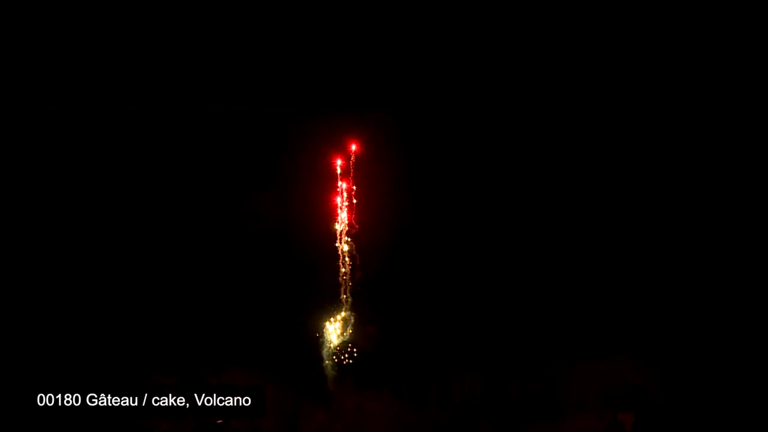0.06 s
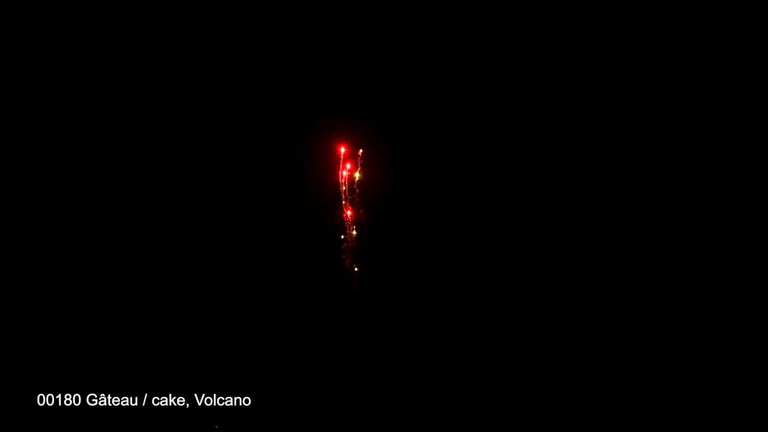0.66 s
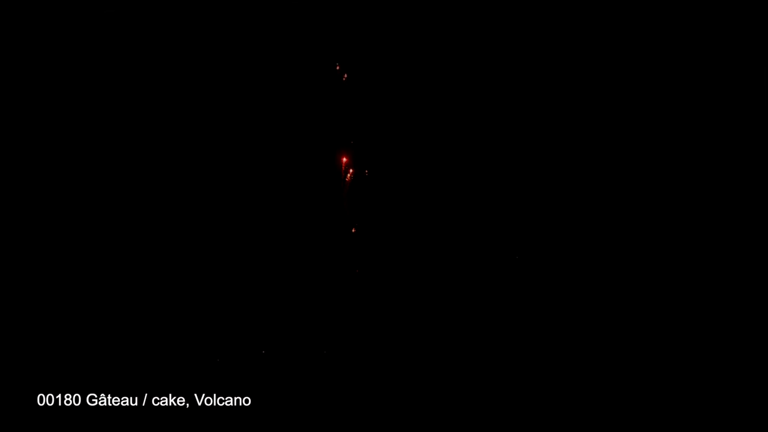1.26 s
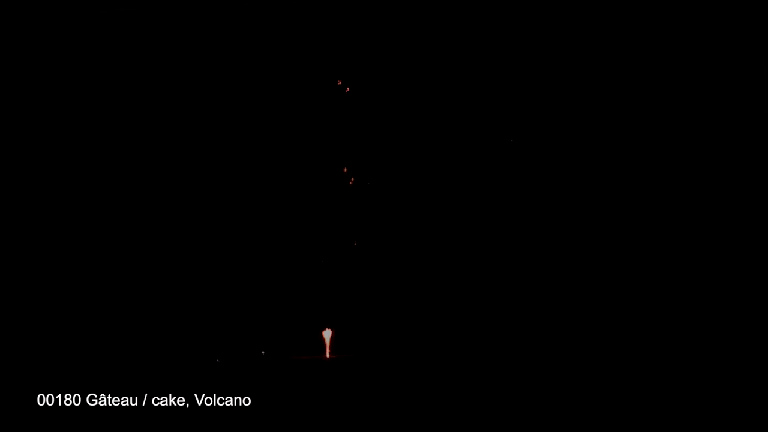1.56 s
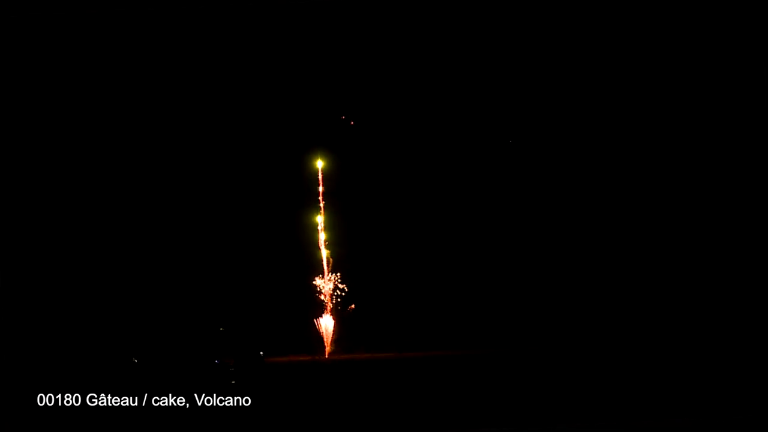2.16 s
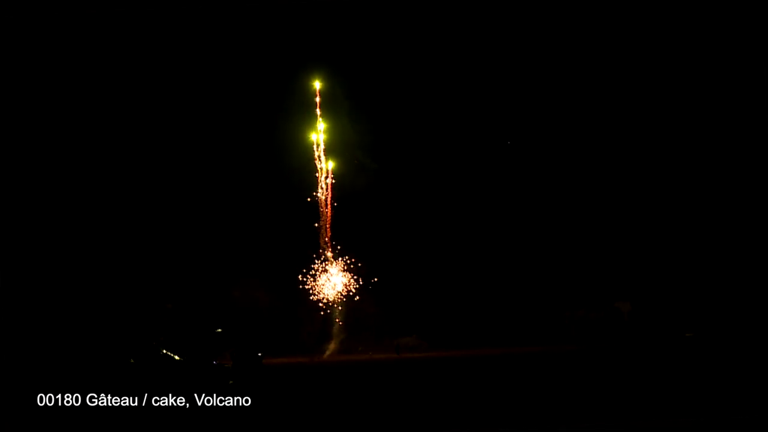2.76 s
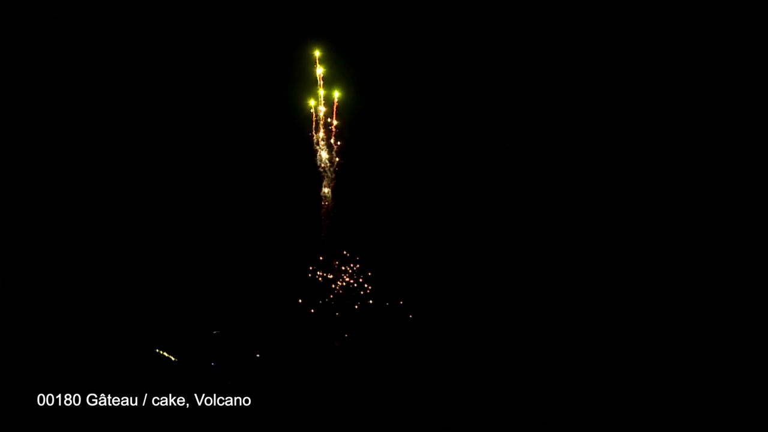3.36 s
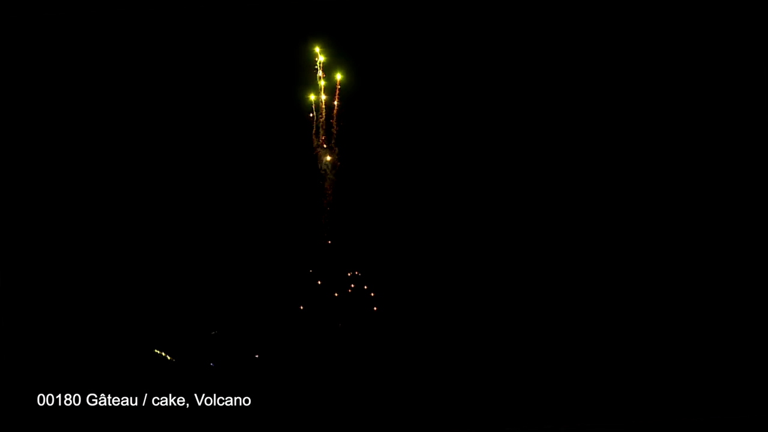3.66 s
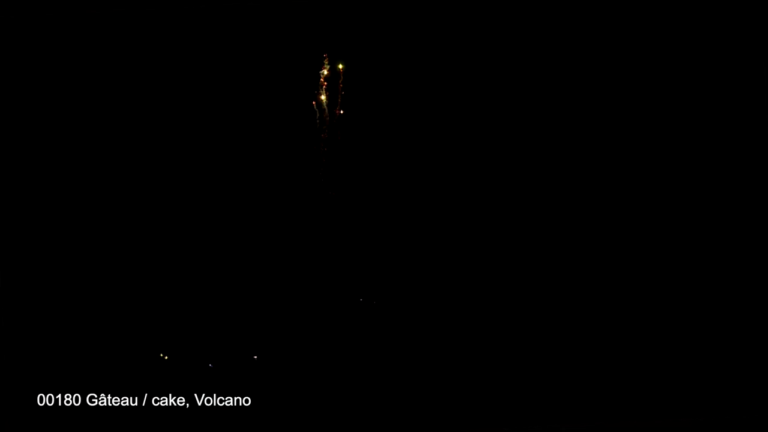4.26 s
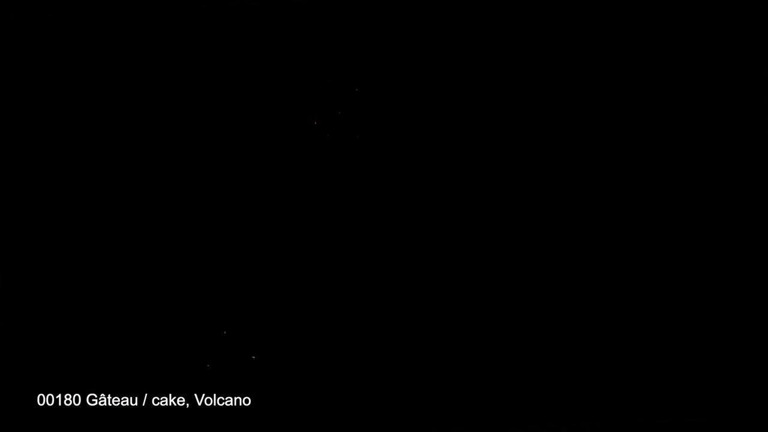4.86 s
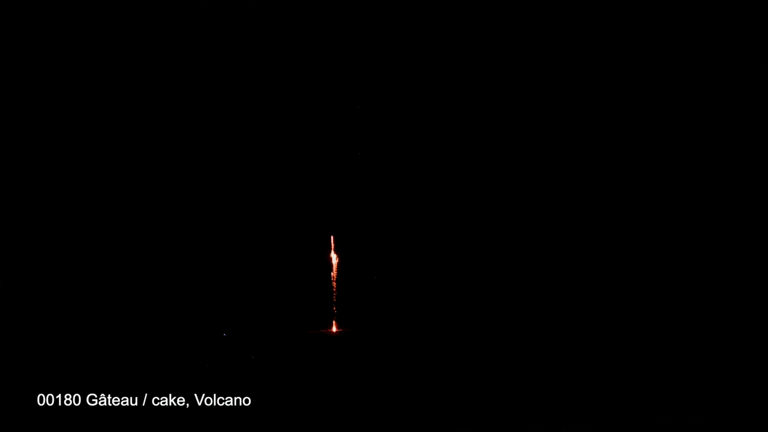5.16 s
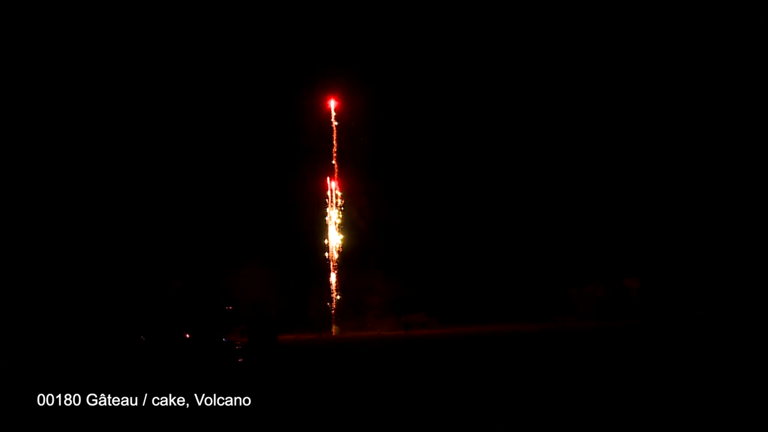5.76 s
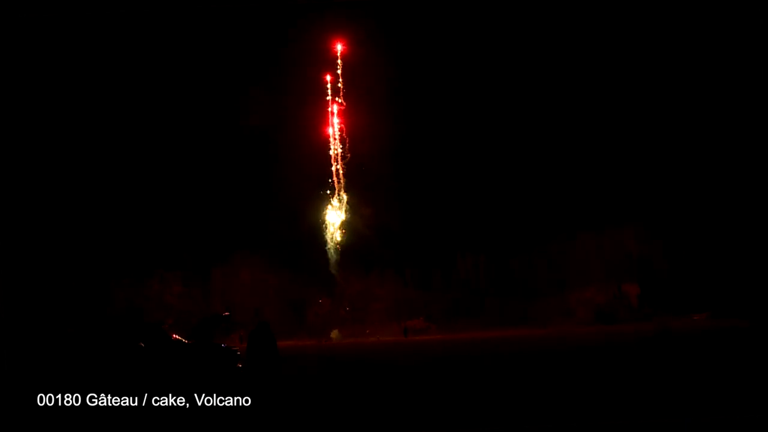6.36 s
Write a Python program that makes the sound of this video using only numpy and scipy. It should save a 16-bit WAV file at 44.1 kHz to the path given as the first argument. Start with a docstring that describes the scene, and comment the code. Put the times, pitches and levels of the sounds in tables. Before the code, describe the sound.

Light wind brushes a small microphone outdoors while fireworks fizz faintly and one star snaps. Five hollow launch thumps come in quick succession, running into about a second of loud, tightly packed crackling that dies away to a soft sizzle. The night goes quiet briefly before a second run of five thumps, more fizzing and a single crack. Trees around the field throw back each thump and crack.

```python
"""A firework cake fires in an open field at night, heard through a small camera microphone. At first,
light wind buffets the microphone, comets already in the sky fizz faintly, and a stray star snaps.
Near 2 s five comets thump out of their tubes and fizz as they climb; a cloud of stars then bursts and
crackles until about 3.4 s. Five more comets go up from 5.3 s, and one last star snaps alone.
A tree line throws back every thump and crack."""
import sys
import numpy as np
from scipy import signal
from scipy.fft import rfft, irfft, next_fast_len
from scipy.io import wavfile
from scipy.ndimage import uniform_filter1d, minimum_filter1d

SR = 44100
rng = np.random.default_rng(int(sys.argv[2]) if len(sys.argv) > 2 else 0)


def generate_wav(sig):
    """Save sig (samples, or channels by samples) to the path in sys.argv[1] as 16-bit PCM at SR."""
    pcm = np.round(np.clip(np.atleast_2d(sig).T, -1, 1) * 32767).astype(np.int16)
    wavfile.write(sys.argv[1], SR, pcm)


N = 287091
TIME = np.arange(N) / SR

# The comets leaving their tubes. Each row: start in seconds, relative thump level in dB,
# upper edge of the thump in Hz, relative level of the spit of gas in dB.
LAUNCHES = [(1.834, 3, 564, -34.5), (1.9654, 1, 586, -33.5), (2.0834, 1, 610, -33),
            (2.2080, -0.5, 643, -37), (2.3941, 3, 470, -40), (5.267, 0, 747, -30.5),
            (5.4776, -2.5, 770, -31), (5.6807, 2, 660, -33), (5.7553, -1, 712, -33.5),
            (5.9193, -0.5, 673, -30.5)]
# The cloud of stars catches, crackles at full rate, then thins out (all in seconds).
CLOUD_START_S, CLOUD_RISE_S, CLOUD_HOLD_S, CLOUD_FALL_S = 2.49, .1, .57, .25
STAR_HZ = 3380  # centre of the blast wave of a middle-sized star


def amp(db):
    """Turn decibels into a number to multiply a sound by."""
    return 10 ** (np.asarray(db) / 20)


def unit(x):
    """Scale a signal so that its average size (rms) is 1."""
    return x / np.sqrt(np.mean(x ** 2) + 1e-20)


def curve(points, t=TIME):
    """Join rows of seconds and value with straight lines."""
    return np.interp(t, *np.transpose(points))


def spectrum(points, hz):
    """Join rows of Hz and value, giving each octave equal room."""
    f, value = np.transpose(points)
    return np.interp(np.log(hz + 1), np.log(f + 1), value)


def add(mix, s, sound):
    """Mix a sound in, starting at s seconds."""
    part = mix[max(round(s * SR), 0):][:len(sound)]
    part += sound[:len(part)]


def noise(points):
    """Noise of average size 1, coloured by rows of Hz and dB."""
    size = next_fast_len(N)
    gains = amp(spectrum(points, np.fft.rfftfreq(size, 1 / SR)))
    return unit(irfft(rfft(rng.standard_normal(size)) * gains, size)[:N])


def flutter(per_s):
    """A random wander of average size 1 that heads for a new value per_s times a second."""
    knots = np.arange(0, TIME[-1] + 1, 1 / per_s)
    return unit(np.interp(TIME, knots, rng.standard_normal(len(knots))))


def air(level_db=-54, drift_db=1.0, flicker_db=.5, split_hz=8500):
    """Quiet night air; its highest hiss drifts and flickers a little."""
    # The tone of the air. Each row: frequency in Hz, relative level in dB.
    colour = [(30, 20.5), (250, 10), (360, 11.5), (470, 2.5), (700, 3), (1300, -2), (1650, 2), (2000, -7.5),
              (2500, -13), (5500, -10.5), (9500, -18.5), (11500, -13), (16000, -17)]
    steady = amp(level_db) * noise(colour)
    top = signal.sosfiltfilt(signal.butter(2, split_hz, "high", fs=SR, output="sos"), steady)
    wander = amp(drift_db * flutter(per_s=5) + flicker_db * flutter(per_s=45))
    return steady + top * (wander - 1)


def wind(boost_db=4):
    """Wind buffets the microphone with a low rumble and a few stronger gusts."""
    # The wind's strength. Each row: time in seconds, relative level in dB.
    strength = [(0.0, -48), (1.52, -45.5), (1.65, -39.5), (2.37, -48), (3.72, -57), (4.08, -44),
                (5.09, -54), (5.28, -48.5), (5.48, -38), (5.86, -35), (6.36, -40.5), (6.51, -53)]
    # The tone of the rumble. Each row: frequency in Hz, relative level in dB.
    colour = [(10, 4.5), (25, 4.5), (50, -2), (90, -8.5), (150, -18), (350, -24.5), (600, -41), (2000, -66)]
    # Single gusts. Each row: time of the peak in seconds, level in dB, length in seconds.
    gusts = [(0.465, -26, 0.046), (1.048, -35, 0.045), (4.024, -33.5, 0.049), (4.23, -33, 0.036),
             (5.767, -22, 0.033), (5.998, -24.5, 0.054)]
    rumble = amp(curve(strength) + boost_db) * noise(colour)
    swells = sum(amp(db) * np.exp(-(2 * (TIME - s) / length) ** 2) for s, db, length in gusts)
    gust_noise = noise([(10, 10.5), (30, -30.0), (55, 1.5), (110, -12.0), (400, -36), (2000, -88)])
    return rumble + swells * gust_noise


def tail_level(launch_s, level_db=-44, delay_s=0.051, rise_s=0.1, life_s=1.78,
               climb_db_per_s=14, burnout_db_per_s=48):
    """How strongly a comet's tail hisses: it lights, fades as it climbs away, and burns out."""
    age = np.maximum(TIME - launch_s - delay_s, 0)
    fade_db = climb_db_per_s * age + burnout_db_per_s * np.maximum(age - life_s, 0)
    return np.minimum(age / rise_s, 1) * amp(level_db - fade_db)


def fizz(sputter_db=1.77, earlier_count=5, earlier_from_s=-1.12, earlier_gap_s=0.17):
    """The comets' burning tails and the cloud's embers hiss and sputter."""
    # The tone of the burning. Each row: frequency in Hz, relative level in dB.
    colour = [(100, -5), (400, 0), (900, -3), (1250, 0.5), (1800, 7), (3000, -3), (6000, -10.5),
              (8000, -13.5), (10000, -12), (16000, -18)]
    # Comets from an earlier volley are still in the sky at the start.
    starts = [earlier_from_s + k * earlier_gap_s for k in range(earlier_count)]
    starts += [s for s, *_ in LAUNCHES]
    level = np.sqrt(sum(tail_level(s) ** 2 for s in starts) + ember_level() ** 2)
    return noise(colour) * level * amp(sputter_db * flutter(per_s=150))


def sizzles(width_octaves=0.49, size=32768):
    """Faint, short swells of narrow hiss, most of them very high."""
    # Each row: time of the peak in seconds, relative level in dB, length in seconds, centre in Hz.
    swells = [(0.03, -64, .025, 12500), (0.506, -51, 0.024, 4430), (0.92, -65, .03, 12500),
              (1.24, -65, .02, 12000), (2.015, -61, .025, 12500), (2.029, -48, 0.061, 4300),
              (3.63, -67, .03, 12500), (4.035, -62, 0.022, 12500), (4.165, -63, .012, 6500),
              (4.185, -67, .025, 13000), (5.33, -51, .022, 5600), (5.456, -45, 0.034, 4180),
              (5.63, -67, .04, 13000)]
    out, hz = np.zeros(N), np.fft.rfftfreq(size, 1 / SR)
    t = (np.arange(size) - size // 2) / SR
    for s, db, length, centre in swells:
        band = np.exp(-(np.log2((hz + 1) / centre) / width_octaves) ** 2)
        hiss = unit(irfft(rfft(rng.standard_normal(size)) * band))
        hiss *= np.exp(-(2 * t / length) ** 2)
        add(out, s + t[0], amp(db) * hiss[s + t >= 0])
    return out


def blast(hz, size=512):
    """A blast wave, strongest around hz: a sudden push of air, then a longer, weaker pull."""
    s = 1j * np.fft.rfftfreq(size, 1 / SR) / hz
    return np.roll(irfft(-s / (1 + s) ** 2 * SR / (2 * np.pi * hz)), 2)


def crack(db, hz, rasp_db=-15.0, rasp_s=0.0014, puff_db=-26.5, puff_hz=400, bounce_gain=0.33):
    """A star bursts: a blast wave, a bright ragged tail, a low puff of gas and a bounce off the ground."""
    t = np.arange(512) / SR
    wave = blast(hz)
    ragged = amp(rasp_db) * rng.standard_normal(len(t)) * np.exp(-t / rasp_s)
    tail = np.convolve(wave, ragged)[:len(t)]
    tail = signal.lfilter(*signal.butter(1, 3000, "high", fs=SR), tail)
    sound = wave + tail + amp(puff_db) * blast(puff_hz)
    # The path by way of the ground is a little longer; how much depends on the star's height.
    bounce_s = 0.001576 * rng.uniform(0.788, 0.9)
    add(sound, bounce_s, bounce_gain * wave)
    return amp(db) * sound


def grille_ring(x, hz, cavity_hz=1620, width_hz=350, ring_db=0.5, db_per_octave=-1.5, spread=0.033):
    """Shocks from the front ring the hollow behind the microphone grille, short, sharp cracks most."""
    centre = cavity_hz * (1 + spread * rng.uniform(-0.88, 1))  # each direction rings a bit differently
    ring = signal.lfilter(*signal.iirpeak(centre, centre / width_hz, fs=SR), x)
    return x + amp(ring_db + db_per_octave * np.log2(STAR_HZ / hz)) * ring


def field_echoes(x, aloft, clean_share, echo_s=0.0028, low_cut_hz=340, clumps_db=0.5):
    """The tree line answers and the far land rumbles on; aloft means the sound comes from the sky."""
    # Sound scattered by trees and land. Each row: delay in seconds, strength in dB for a launch,
    # strength in dB for a star.
    scatter = [(0, 7, -3), (0.021, 1.5, 5.5), (.05, -8.5, -0.5), (.075, -4, 10.5), (.1, 1.5, 8.5),
               (.125, 0.5, 3.5), (.16, 9.5, 9.5), (.22, -1.5, 2), (.4, -11.5, -5), (.8, -11.5, -13),
               (1.4, -35.5, -21.5), (2.2, -53.5, -57)]
    # Distinct echoes off the trees. Each row: delay in seconds, dB for a launch, dB for a star.
    tree_echoes = [(.093, -20, -10), (.109, -2.5, -2.5), (.122, -5.5, -5), (.143, -11, -14),
                   (.157, -9, -5.5), (.163, -6, -14)]
    # The tone of all the echoes. Each row: frequency in Hz, gain in dB.
    colour = [(40, 4.5), (150, -2), (400, -3.5), (700, -7), (1150, -1), (1700, 3.5), (3000, -7),
              (4200, -11.5), (5500, -15.5), (9000, -16), (16000, -19)]
    # How the echoes dull with time. Each row: frequency in Hz, extra dB lost per second.
    loss = [(100, -2.5), (400, -2), (900, 0.5), (1700, 1.5), (3000, 6), (5500, 18), (12000, 40)]
    t = np.arange(int(2.2 * SR)) / SR
    column = 2 if aloft else 1
    echoes = [(row[0], row[column]) for row in tree_echoes]
    land, trees = rng.standard_normal((2, len(t))) / np.sqrt(SR)
    scatter_db = curve([(row[0], row[column]) for row in scatter], t)
    # Bushes and trunks stand in clumps, so the scatter comes back in lumps.
    land *= amp(scatter_db + clumps_db * flutter(per_s=150)[:len(t)])
    # Each echo is part ragged tail, part clean reflection.
    tail_power = sum(amp(db) ** 2 * (t > delay) * np.exp(-abs(t - delay) / echo_s) / echo_s
                     for delay, db in echoes)
    trees *= np.sqrt((1 - clean_share) * tail_power)
    for delay, db in echoes:
        add(trees, delay, np.sqrt(clean_share) * amp([db]))
    # Long waves bend round the trunks, so the distinct echoes lack bass.
    trees = signal.lfilter(*signal.butter(2, low_cut_hz, "high", fs=SR), trees)
    hz, late_s, bands = signal.stft(land + trees, SR, nperseg=256)
    bands *= amp(spectrum(colour, hz)[:, None] - spectrum(loss, hz)[:, None] * late_s)
    response = signal.istft(bands, SR, nperseg=256)[1]
    return signal.fftconvolve(x, response)[:N]


def launch(db, edge_hz, spit_db, body_hz=270, shudder_db=-29, shudder_s=0.01, thump_db=0.46,
           snap_db=6.5, snap_s=0.0034, hiss_db=-7, hiss_s=0.035, spit_hz=7500, skyward=1.296):
    """The lift charge leaves its tube as a rounded thump; the cake shudders and hot gas spits out."""
    t = np.arange(4096) / SR
    shudder, gas = rng.standard_normal((2, len(t)))
    push = blast(body_hz, size=4096) + amp(shudder_db) * shudder * np.exp(-t / shudder_s)
    # Grass dulls the sound that skims the ground; what rises towards the trees stays brighter.
    along_ground = signal.sosfilt(signal.butter(5, edge_hz, fs=SR, output="sos"), push)
    to_trees = signal.sosfilt(signal.butter(4, skyward * edge_hz, fs=SR, output="sos"), push)
    rise = np.minimum(t / 0.00044, 1)
    fall = amp(snap_db) * np.exp(-t / snap_s) + amp(hiss_db) * np.exp(-t / hiss_s)
    spit = signal.lfilter(*signal.butter(1, spit_hz, fs=SR), gas * rise * fall)
    return amp(db + thump_db) * np.array([along_ground, to_trees]) + amp(spit_db) * spit


def sparks(peak_per_s=190, level_db=-9.0, spread_db=3, centre_hz=2900):
    """Many smaller bursts fill the gaps as the cloud of stars builds, holds and thins out."""
    age = TIME - CLOUD_START_S
    thinning = 1 - (age - CLOUD_RISE_S - CLOUD_HOLD_S) / CLOUD_FALL_S
    activity = np.clip(np.minimum(age / CLOUD_RISE_S, thinning), 0, 1)
    fired = rng.random(N) < activity * peak_per_s / SR
    sizes = amp(level_db + spread_db * np.clip(rng.standard_normal(N), -2, 2))
    return signal.oaconvolve(fired * sizes, blast(centre_hz))[:N]


def ember_level(peak_s=3.325, peak_db=-34, swell_db_per_s=24, fade_db_per_s=32):
    """How strongly the cloud's embers hiss: they gather while it crackles, then die away."""
    fade_db = np.maximum(swell_db_per_s * (peak_s - TIME), fade_db_per_s * (TIME - peak_s))
    return np.clip((TIME - CLOUD_START_S) / CLOUD_RISE_S, 0, 1) * amp(peak_db - fade_db)


def microphone(x, size=4096, smear_hz=3200, smear_width_hz=250):
    """The microphone's housing colours the sound, smears each shock and rings briefly after it."""
    # The overall tone. Each row: frequency in Hz, gain in dB.
    colour = [(20, 8), (300, 3.5), (600, 3), (1000, 1.5), (1400, -1), (2000, -6.5), (3000, -3),
              (4500, -0.5), (6200, -5), (7500, -5.5), (9500, -25), (12500, -22.5), (16000, -36.5)]
    # Peaks and dips made by the sound opening. Each row: centre in Hz, width in Hz, gain in dB.
    resonances = [(824, 130, 6), (1680, 205, 6.5), (2344, 218, 9.5), (2620, 335, -8), (2890, 86, 2),
                  (5466, 580, 6), (7595, 720, -14), (8300, 500, 5), (11230, 960, 7)]
    hz = abs(np.fft.fftfreq(size, 1 / SR))
    peaks_db = sum(db / (1 + (2 * (hz - centre) / width) ** 2) for centre, width, db in resonances)
    log_gain = np.log(amp(spectrum(colour, hz) + peaks_db))
    # This step (minimum phase) puts the ringing after each shock, never before it.
    response = np.fft.ifft(np.exp(np.conj(signal.hilbert(log_gain)))).real[:size // 2]
    coloured = signal.oaconvolve(x, response)[:N]
    # An all-pass filter delays the sound near smear_hz without changing its level.
    all_pass = signal.iirpeak(smear_hz, smear_hz / smear_width_hz, fs=SR)[1]
    return signal.lfilter(all_pass[::-1], all_pass, coloured)


def scene(places=3, crack_db=-2, crack_echo_db=-4.5, carry_db_per_octave=1.03,
          launch_echo_db=-2.5, sizzle_db=-2):
    """Bursts at several places, each place with its own echoes, over fizz, wind and night air."""
    # The star bursts that stand out. Each row: start in seconds, relative level in dB,
    # centre of the blast wave in Hz (low for a big charge).
    bursts = [(0.2148, 4.5, 1300), (2.1398, 2, 4170), (2.2961, 4, 3790), (2.3347, 13, 2898),
              (2.35, 10.5, 3390), (2.3881, 5, 2700), (2.4169, 6.5, 2690), (2.4285, -10.5, 3500),
              (2.4351, 10, 3200), (2.4417, 2.5, 1710), (2.4545, -6, 2940), (2.4675, -8.5, 3500),
              (2.4762, 6, 2430), (2.4939, 6.5, 1654), (2.4985, 1, 2420), (2.5145, -4.5, 2600),
              (2.5216, 17, 4800), (2.5258, 12.5, 3100), (2.531, -2.5, 3000), (2.5355, 0.5, 1900),
              (2.539, 9.5, 2300), (2.5464, 7.5, 3500), (2.5649, 13, 3200), (2.573, 11, 3800),
              (2.5865, 16.5, 4800), (2.5903, 4.5, 4200), (2.5981, 8, 3200), (2.6036, 10.5, 2400),
              (2.6106, 12.5, 3200), (2.615, 4.5, 1710), (2.626, 15, 4500), (2.6435, 4, 2200),
              (2.6479, 7, 2000), (2.6532, 1.5, 4800), (2.6585, 9, 3800), (2.6656, 12.5, 4800),
              (2.6693, 4.5, 1410), (2.6775, 2, 1900), (2.6822, 13.5, 4800), (2.69, 12.5, 4840),
              (2.6968, 10, 3000), (2.7034, 9, 3000), (2.7058, 5, 1600), (2.71, 7, 3200), (2.7187, 12, 4400),
              (2.7218, 15.5, 2980), (2.728, 8.5, 4700), (2.7398, 10.5, 3400), (2.7429, -4.5, 2400),
              (2.7463, 10.5, 2710), (2.7494, 6, 2500), (2.7551, -2, 2500), (2.7649, 9, 2700),
              (2.7691, 7.5, 2100), (2.7722, 16, 3800), (2.7742, 3.5, 3000), (2.7764, 11, 2100),
              (2.7807, 6, 2500), (2.7839, 5, 2300), (2.79, -0.5, 1710), (2.7983, 10, 3180),
              (2.801, 6, 2400), (2.8084, 12, 2330), (2.8117, 1.5, 2613), (2.8243, 5.5, 2500),
              (2.826, 16.5, 4800), (2.8345, 11.5, 1610), (2.8524, -5.5, 1700), (2.8574, -3, 4800),
              (2.8735, 11, 2920), (2.885, 6.5, 4200), (2.8882, 6.5, 1900), (2.8916, 11, 3210),
              (2.8951, 3.5, 1590), (2.8991, 14, 4830), (2.909, 1, 3300), (2.914, 3, 1500),
              (2.9178, 9.5, 4000), (2.9287, 1.5, 2600), (2.9346, 1.5, 2540), (2.9408, 4, 2000),
              (2.9433, 7, 2600), (2.9565, 8.5, 3500), (2.9578, 12.5, 2100), (2.9656, 5.5, 1400),
              (2.9695, 1.5, 1500), (2.9729, 7.5, 1500), (2.9841, 3, 2600), (2.9887, -0.5, 2700),
              (2.9968, 9, 2500), (3.0019, 11.5, 1395), (3.005, 16, 4800), (3.0218, 9, 2100),
              (3.0257, 10, 3160), (3.0292, 2, 2000), (3.031, -2.5, 2200), (3.0383, 8.5, 3500),
              (3.0415, -2.5, 2700), (3.0462, 8, 1600), (3.0613, 2, 2400), (3.0648, -1.5, 2800),
              (3.075, 14.5, 3200), (3.0822, -8, 1500), (3.0847, 5, 2400), (3.0885, -11, 2000),
              (3.0956, 1, 2100), (3.1005, -4, 2400), (3.1127, 4, 1300), (3.1141, 6, 4700),
              (3.1221, -1.5, 2400), (3.1329, -10, 1500), (3.1363, 6.5, 3400), (3.1399, 5, 3200),
              (3.1465, 0.5, 3800), (3.1482, 18.0, 4820), (3.1595, 7, 3200), (3.1674, 6.5, 2500),
              (3.1788, 7, 2280), (3.1895, 4, 1400), (3.1958, 10, 3470), (3.2038, -2, 3400),
              (3.2133, 9.5, 2300), (3.22, 7.5, 3100), (3.2373, 5.5, 3000), (3.2406, 12.5, 2200),
              (3.2426, 5.5, 2980), (3.2595, 4, 2000), (3.2777, 8, 2180), (3.2824, 8, 2294),
              (3.2901, 6, 2500), (3.297, 8, 1980), (3.3079, 2, 2600), (3.3146, 10, 2700),
              (3.3176, 4.5, 4200), (3.3285, 5.5, 1490), (3.3457, -6, 2900), (3.3643, 3, 1690),
              (3.3701, 9, 4000), (3.3825, -5, 3200), (3.3948, 6, 3270), (3.4395, 0.5, 3600),
              (3.4443, 6, 1590), (6.3855, 7, 1350)]
    from_ground, from_sky = np.zeros((2, places, N))
    thumps, stars = np.zeros((2, N))
    for k, (s, *shot) in enumerate(LAUNCHES):
        along_ground, to_trees = launch(*shot)
        add(thumps, s, along_ground)
        add(from_ground[k % places], s, amp(launch_echo_db) * to_trees)
    for k, (s, db, hz) in enumerate(bursts):
        add(stars, s, grille_ring(crack(db + crack_db, hz), hz))
        # The long blast wave of a big charge carries better to the trees.
        carry_db = carry_db_per_octave * np.log2(STAR_HZ / hz)
        add(from_sky[k % places], s, amp(db + crack_echo_db + carry_db) * blast(hz))
    crackle = sparks()
    from_sky[0] += amp(crack_echo_db) * crackle
    echoes = sum(field_echoes(place, aloft=False, clean_share=0.41) for place in from_ground)
    echoes += sum(field_echoes(place, aloft=True, clean_share=0.27) for place in from_sky)
    fireworks = stars + grille_ring(crackle, STAR_HZ) + thumps + echoes + fizz()
    return (microphone(fireworks) + amp(sizzle_db) * sizzles() + wind() + air())[None]


def record(dry, ceiling=.85, window_samples=40, top_hz=16050):
    """A fast limiter turns the loudest shocks down for a moment; then the highest treble is cut."""
    needed_gain = np.minimum(1, ceiling / (abs(dry) + 1e-9))
    smooth_gain = uniform_filter1d(minimum_filter1d(needed_gain, window_samples), window_samples)
    low_pass = signal.firwin(511, top_hz, window=("kaiser", 9), fs=SR)
    return signal.oaconvolve(dry * smooth_gain, low_pass[None], "same")


dry = scene()
out = record(dry)
generate_wav(out)
```